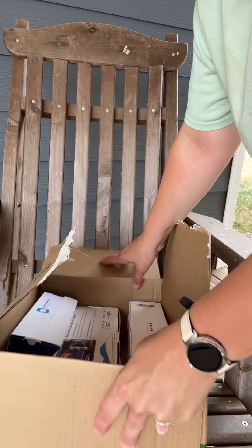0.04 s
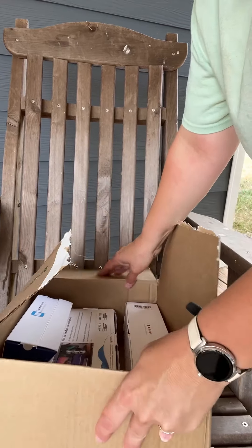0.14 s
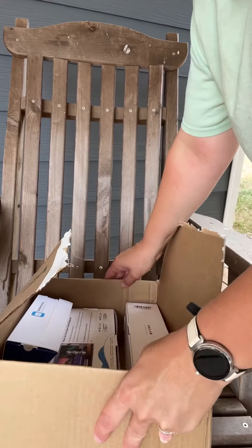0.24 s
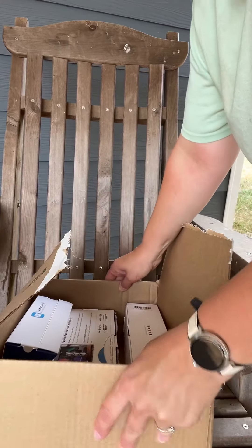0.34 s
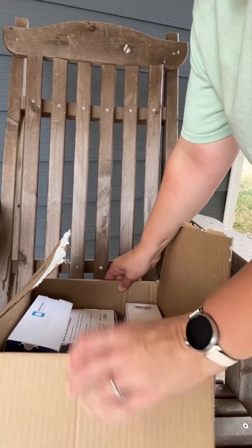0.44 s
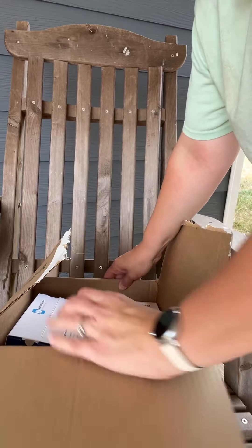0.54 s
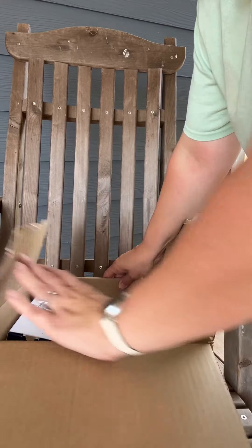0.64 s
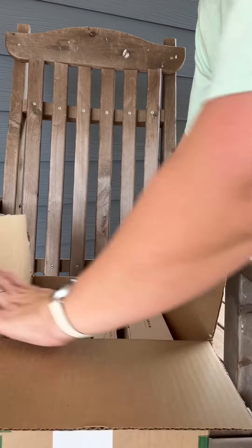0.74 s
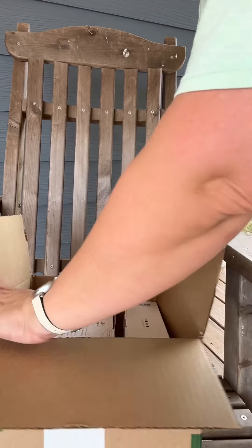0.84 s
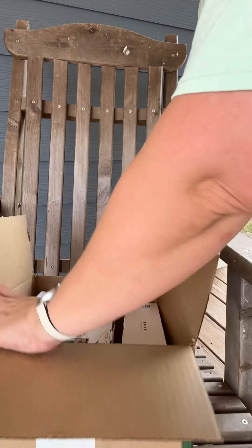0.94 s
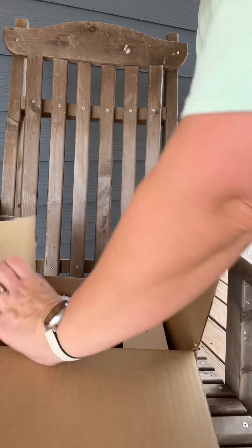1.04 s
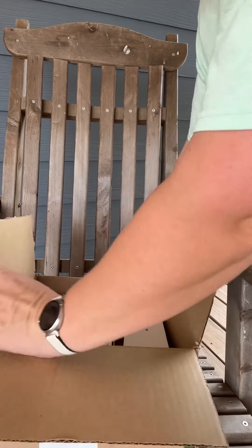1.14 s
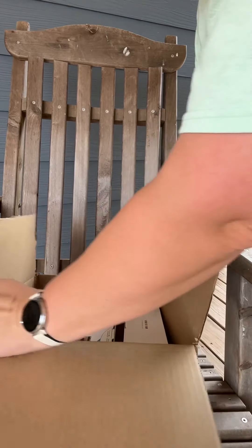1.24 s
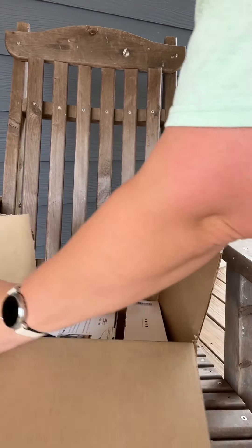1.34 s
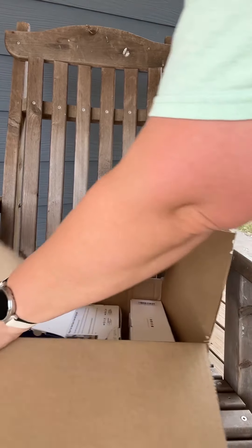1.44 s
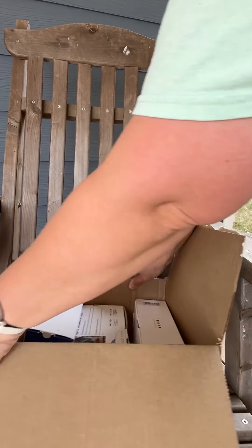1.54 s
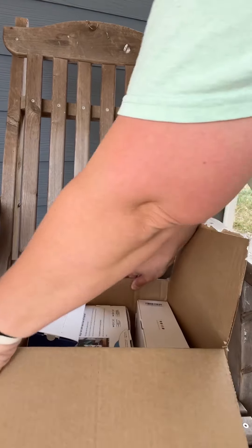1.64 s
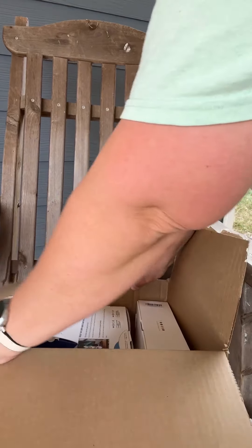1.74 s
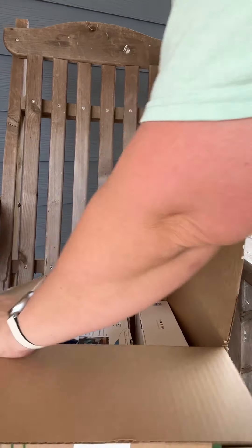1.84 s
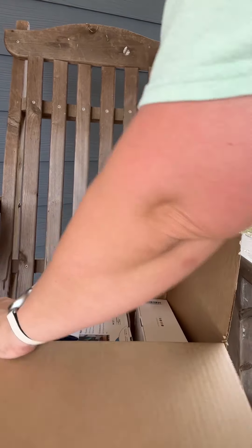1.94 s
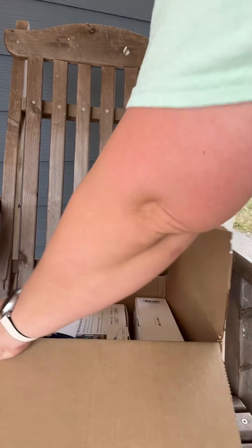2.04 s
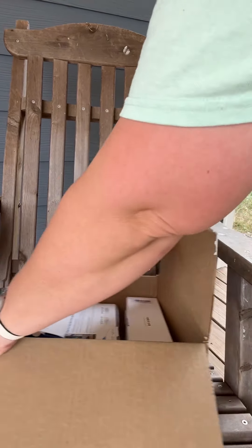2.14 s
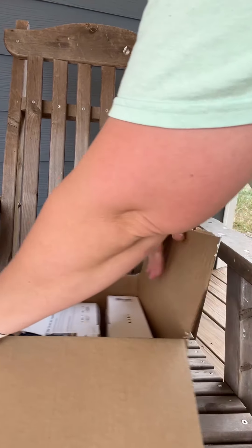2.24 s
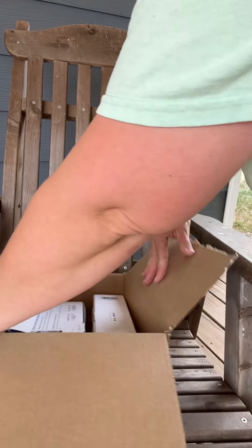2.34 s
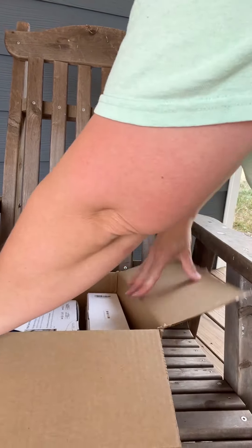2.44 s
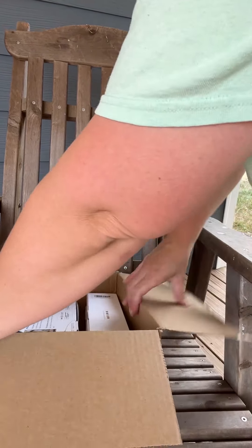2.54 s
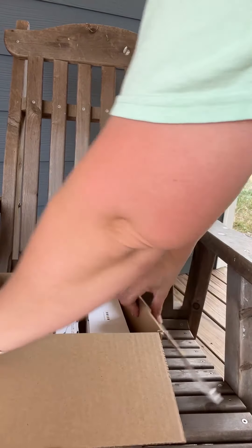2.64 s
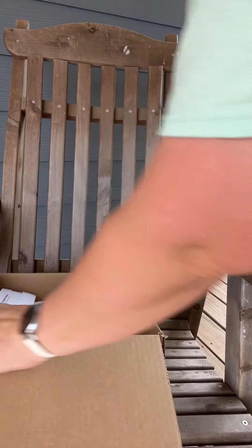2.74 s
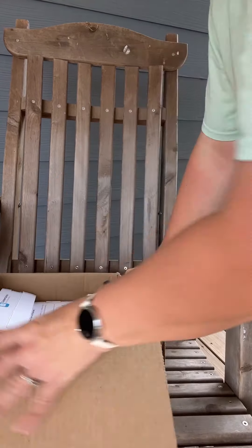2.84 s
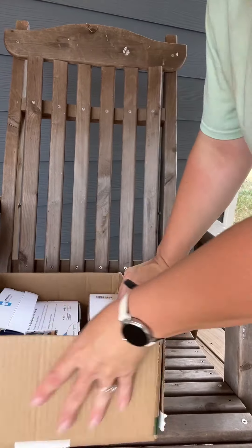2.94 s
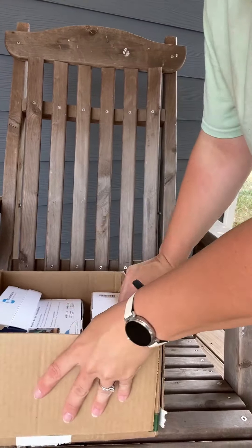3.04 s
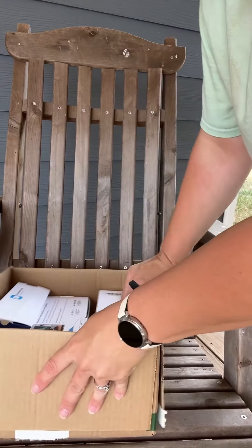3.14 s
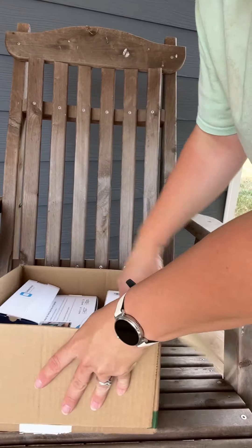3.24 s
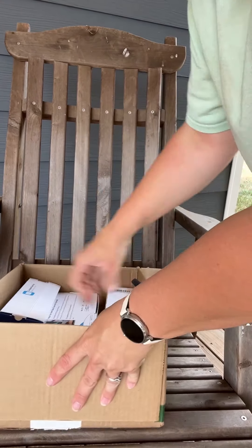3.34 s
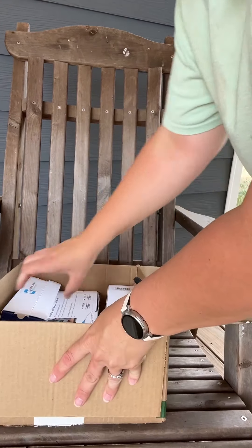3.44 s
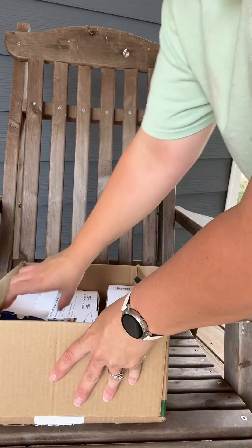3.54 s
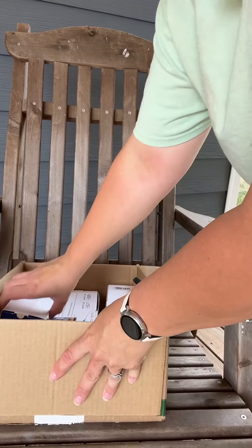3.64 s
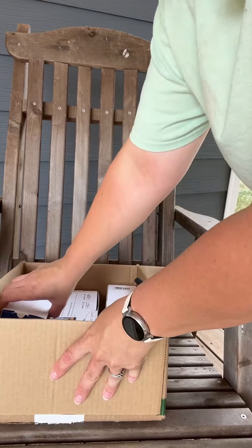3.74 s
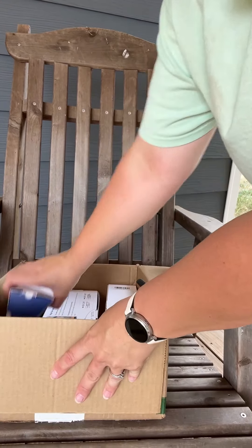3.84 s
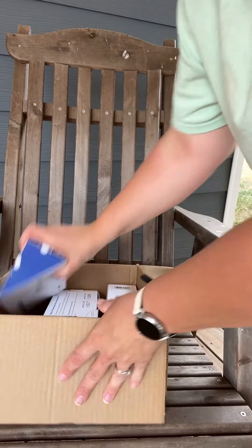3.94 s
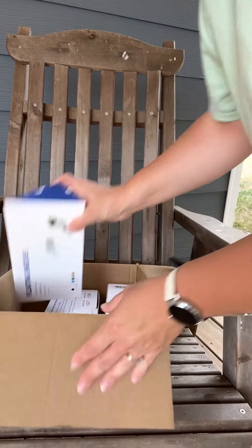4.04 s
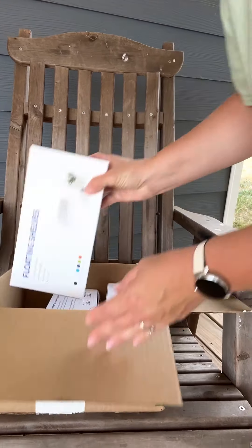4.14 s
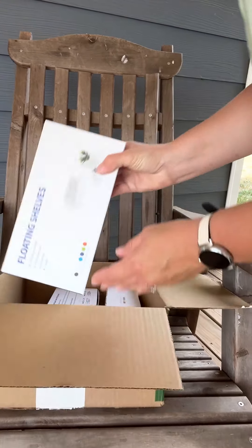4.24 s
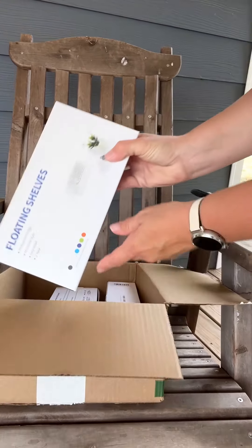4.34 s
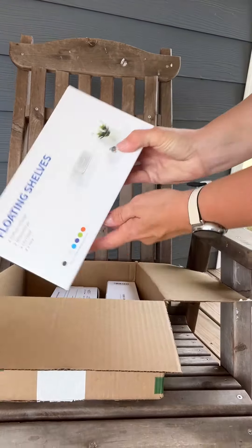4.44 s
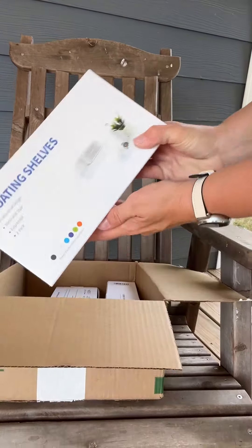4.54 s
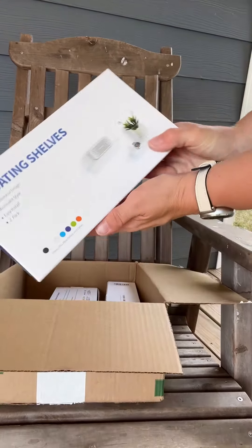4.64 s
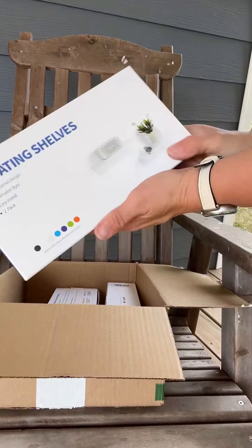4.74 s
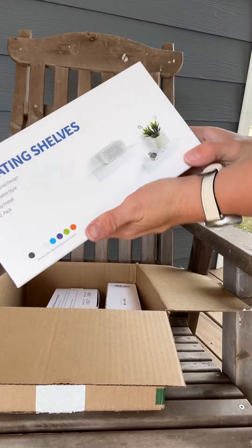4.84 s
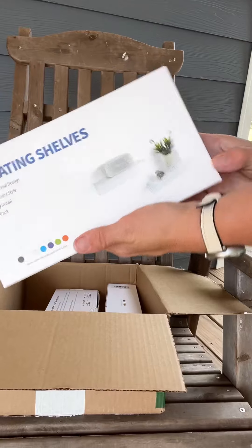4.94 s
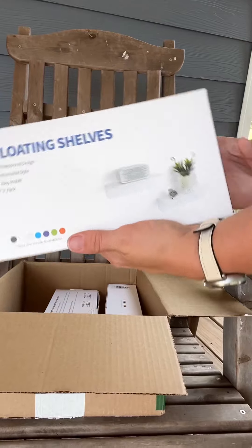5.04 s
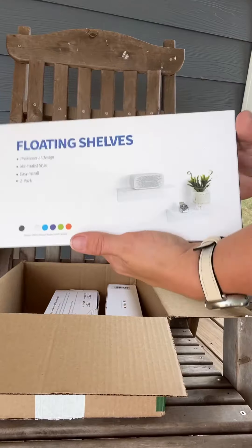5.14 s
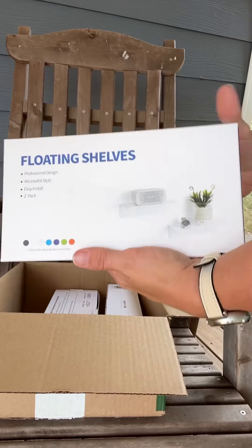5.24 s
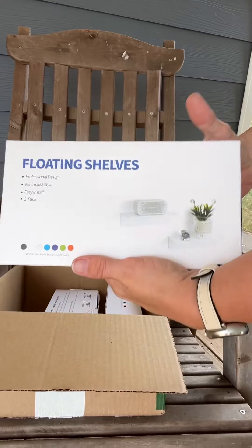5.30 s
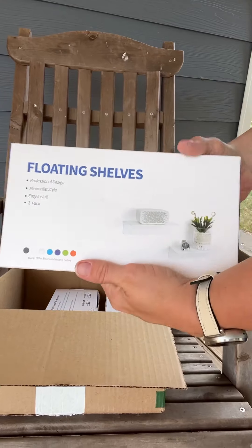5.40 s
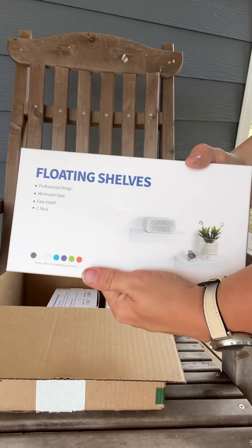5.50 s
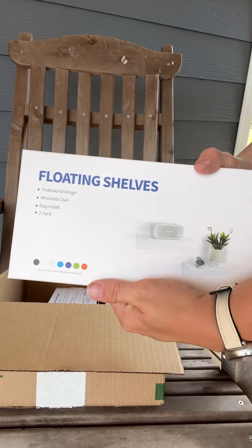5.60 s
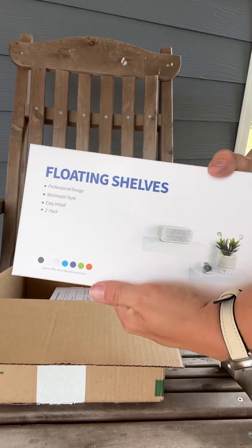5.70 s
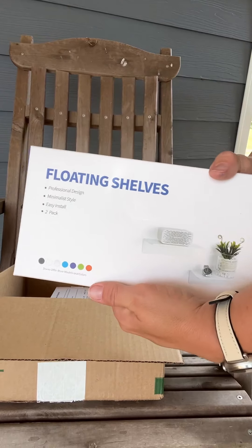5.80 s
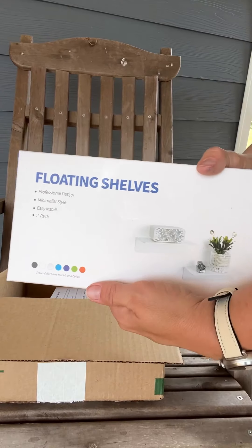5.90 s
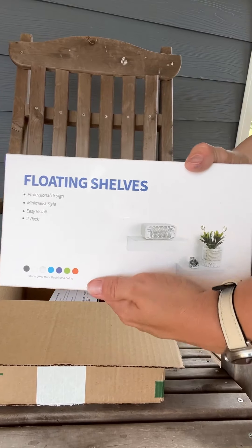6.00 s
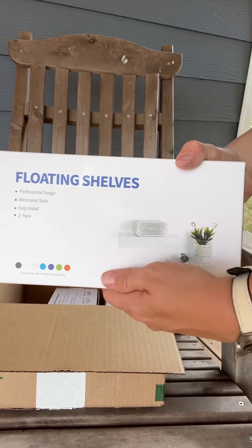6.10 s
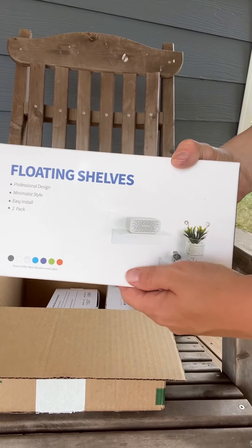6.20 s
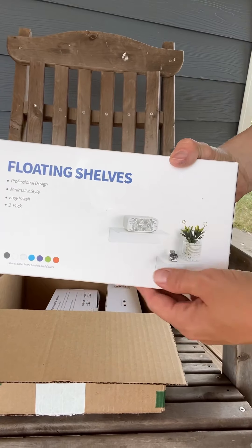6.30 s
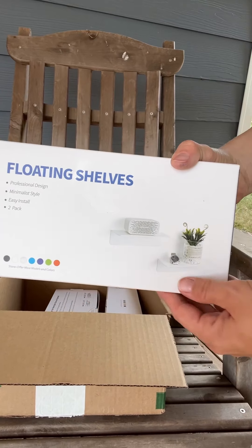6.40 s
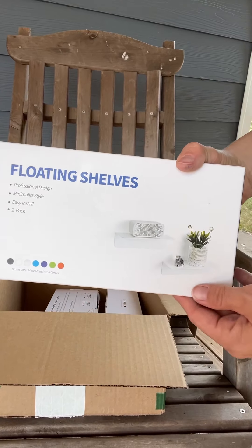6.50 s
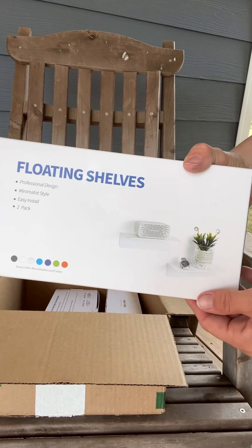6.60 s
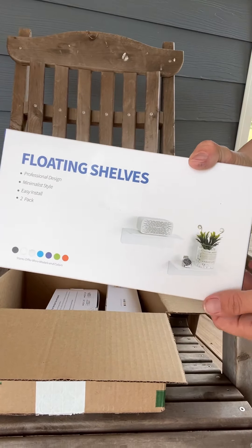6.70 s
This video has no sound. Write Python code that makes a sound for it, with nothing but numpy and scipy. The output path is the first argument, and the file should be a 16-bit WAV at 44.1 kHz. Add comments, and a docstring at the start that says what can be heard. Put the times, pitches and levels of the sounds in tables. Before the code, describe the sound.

A busy cardboard carton close up: stuttering flap, one loud knock, dry hissing scrapes with crackling fibres, boxy thumps with slight rattle, a few scratchy scuffs and sharp snaps. After about four seconds the activity thins to small muted taps and fine, bright finger rubbing on smooth card. Short diffuse porch reflections surround it, with faint low rumble outdoors beneath.

```python
"""Unpacking a carton, close up

A cardboard carton is unpacked on a wooden porch chair, close to a two-port microphone.
Slides are flickering noise; a tight flap judders free as stick-slip pulses ring its resonances.
Flaps thump as sagging panel tones with a ringing carton, and hard edges click as short noise snaps.
A small box is drawn out, caught with damped notes and stroked with bright noise.
The porch adds a short diffuse tail, and a faint outdoor rumble lies underneath."""
import sys
import numpy as np
from scipy import signal
from scipy.fft import rfft, irfft, next_fast_len
from scipy.io import wavfile
from scipy.ndimage import uniform_filter1d, map_coordinates

SR = 44100
rng = np.random.default_rng(int(sys.argv[2]) if len(sys.argv) > 2 else 0)


def generate_wav(signal):
    """Clip the signal to [-1, 1] and save it as 16-bit WAV at the path in sys.argv[1]."""
    frames = np.transpose(np.atleast_2d(signal))
    scaled = np.clip(frames, -1, 1) * 32767
    pcm = np.round(scaled).astype(np.int16)
    wavfile.write(sys.argv[1], SR, pcm)


N = 298116
TIME = np.arange(N) / SR
AGE = TIME[:SR // 2]  # time since a contact [s]

# distant outdoor rumble, spectrum: (frequency [Hz], relative level [dB per Hz])
OUTDOORS_SPECTRUM = [(20, -28), (35, -1.5), (52, 12.5), (75, -2.5), (115, 5.5), (190, -7.5), (600, -20),
                     (1500, -30), (14000, -46)]
# slides of card and skin over the carton, levels at full speed:
# (start [s], speeding up [s], slowing down [s], hiss level [dB], panel rasp level [dB])
SLIDES = [(-.06, 0.16, 0.064, -40, -47), (.09, 0.11, 0.048, -36, -34.5), (.2, 0.14, .05, -49, -45.5),
          (.33, 0.14, 0.057, -33.5, -43), (.565, 0.0033, 0.14, -41, -43), (.52, 0.042, 1, -52, -56),
          (.77, 0.12, 0.074, -43.5, -47.5), (.9, 0.09, 0.11, -47, -44.5), (1.06, 0.068, 0.45, -46.5, -55.5),
          (1.27, 0.18, 0.12, -44.5, -49.5), (1.47, 0.11, 0.18, -43, -46), (1.742, 0.0093, 0.26, -40, -47),
          (1.9, 0.15, 0.22, -49, -47), (2.1, 0.13, 0.27, -40, -44), (2.33, 0.36, 0.076, -42, -51.5),
          (2.59, 0.19, 0.2, -36.5, -46.5), (2.855, 0.045, 0.093, -29.5, -41.5),
          (2.96, 0.3, 0.052, -41, -43), (3.25, 0.11, 0.13, -44, -43), (3.36, 0.26, 0.2, -67, -56),
          (3.65, 0.01, 0.11, -53, -53.5), (3.75, 0.17, 0.17, -51, -51.5), (4.03, 0.075, 0.048, -49, -56),
          (4.12, 0.16, 0.25, -64.5, -58)]
# surface hiss of rubbed card: (frequency [Hz], relative level [dB per Hz])
CARD_HISS_SPECTRUM = [(300, -29), (1200, -3.5), (3000, -3.5), (6200, -1), (7800, -9.5), (10500, 1.5),
                      (13500, -1.5), (15000, -22.5)]
# rasp of the pressed panel: (frequency [Hz], relative level [dB per Hz])
PANEL_RASP_SPECTRUM = [(60, 2.5), (150, 4), (350, 2), (520, -5), (850, -0.5), (1500, -8), (2600, -20),
                       (9000, -32.5)]
# snapping fibres: (frequency [Hz], relative level [dB per Hz])
CRACKLE_SPECTRUM = [(400, -13), (1100, 1.5), (3000, -2.5), (6000, -8), (12000, -23)]
# likeness of rubbing at the two ports: (frequency [Hz], shared power [0 to 1])
PORT_LIKENESS = [(500, 0.54), (5000, .3), (9500, 0.65)]
# knocks on cardboard: (time [s], level [dB], settled panel pitch [Hz], panel t60 [s],
# contact brightness [Hz], carton ring and rattle against the panel [dB], pressing time [s])
KNOCKS = [(0.089, -34.5, 83.4, .15, 398.5, -13, 0.0078), (0.3363, -12.5, 346, 0.019, 3200, -4.5, 0.0013),
          (0.347, -27.5, 115, 0.044, 391, -2.5, 0.0024), (0.472, -36.5, 326, 0.14, 900, 4, .006),
          (0.6157, -27.5, 302.4, 0.11, 1680, 1.5, 0.00032), (1.172, -30, 690, 0.044, 1250, -4, 0.0048),
          (1.179, -20.5, 180, 0.17, 630, -0.5, 0.0035), (1.232, -27.5, 341, 0.044, 897, -3.5, 0.0039),
          (1.314, -34.5, 332, 0.043, 1730, 4.5, 0.0042), (1.326, -26.5, 67.6, 0.097, 303, -6, 0.011),
          (1.919, -32, 85, 0.14, 2200, -4.5, 0.0034), (1.968, -36, 322, 0.087, 1380, 10, 0.00054),
          (1.985, -32, 113, 0.17, 627, 3, 0.0043), (2.219, -25.5, 324, 0.13, 1250, -1.5, 0.0038),
          (2.234, -26.5, 244.5, 0.075, 1000, 0, 0.0068), (2.238, -29, 92.9, 0.21, 498, -3.5, 0.012),
          (2.513, -33, 183, 0.1, 586, 2, 0.0092), (2.745, -35, 272, 0.12, 1300, 5, 0.0065),
          (2.9704, -25.5, 460, 0.017, 2190, 6, 0.00098), (2.976, -28.5, 127, 0.028, 500, -7, 0.0038),
          (3.649, -42, 840, 0.048, 2440, 6, 0.00085), (3.666, -26, 268, 0.023, 430, -1, 0.0038),
          (3.927, -33, 263, 0.086, 1200, 0.5, 0.0008), (4.3518, -25, 387, 0.03, 1520, 5, 0.00075)]
# modes of the carton: (nominal pitch [Hz], nominal level [dB], t60 at damping 1 [s])
CARTON_MODES = [(103.5, -10.5, 0.28), (176.7, -8.5, 0.31), (255, -9, 0.31), (405, -2, 0.089),
                (554, -10.5, 0.085), (731, -4, 0.04), (995.5, -5.5, 0.11), (1262, -3.5, 0.044),
                (1610, -3, 0.043)]
# rattle of the contents: (frequency [Hz], relative level [dB per Hz])
RATTLE_SPECTRUM = [(40, 21.5), (110, 29.5), (350, 9.5), (520, -7.5), (1500, -3.5), (4000, 15.5),
                   (12000, -100)]
# tugs that drag the tight flap past its neighbour:
# (start of full pressure [s], time at full pressure [s], level [dB], brightness [Hz])
TUGS = [(0.125, .005, -19.5, 1393), (0.183, 0.015, -17, 5080)]
# resonances of that flap: (centre [Hz], width [Hz], level [dB])
FLAP_RESONANCES = [(100, 60, -10), (237, 40, -6), (398, 40, -6), (622, 40, -7), (732, 42, 3.5),
                   (974, 60, -6), (1290, 45, -7), (1500, 60, -11), (2050, 120, -11), (2350, 120, -12),
                   (2850, 300, -21)]
# sharp clicks of nails and card edges: (time [s], approximate peak level [dB], tilt [dB per octave])
TICKS = [(0.3364, -13, -3.5), (0.9843, -21.5, 5), (1.1709, -12, 4), (1.2025, -6.5, 1.2), (3.545, -31, -3.5),
         (3.769, -33, -2.5), (3.926, -27.5, -1), (4.272, -41.5, .5), (4.334, -22.5, -0.3)]
# click before its tilt: (frequency [Hz], relative level [dB per Hz])
CLICK_SPECTRUM = [(300, -14.5), (2700, -3), (5500, -5), (8000, -7), (11000, -4.5), (14000, -10.5),
                  (16000, -22.5)]
# scuffs that sing in one resonance of the card:
# (middle [s], half length [s], level [dB], start pitch [Hz], end pitch [Hz])
SCUFFS = [(0.444, 0.077, -45.5, 2460, 1290), (0.48, 0.022, -33.5, 1370, 1210),
          (0.961, 0.045, -43, 2500, 1990), (0.997, 0.0076, -37, 2800, 2970),
          (2.267, 0.059, -41, 1950, 1870), (2.757, .13, -42, 3400, 2210), (3.219, .035, -42.5, 2440, 2160),
          (3.308, .1, -46.5, 1000, 1200), (4.092, 0.062, -53.5, 940, 1060)]
# fingertips tapping the small box: (time [s], level [dB], pitch [Hz])
TAPS = [(4.206, -45, 336), (4.405, -44, 453), (5.259, -62, 646), (5.748, -61, 780)]
# finger strokes on the small glossy box, levels at full speed:
# (start [s], speeding up [s], slowing down [s], hiss level [dB], panel rasp level [dB])
STROKES = [(4.38, 0.039, 0.44, -60, -61.5), (4.65, 0.064, 0.42, -61.5, -62.5),
           (4.85, 0.072, 0.22, -58.5, -80), (5.124, 0.012, 0.14, -57, -66),
           (5.26, 0.19, 0.14, -64.5, -61.5), (5.67, 0.08, 0.14, -87, -67.5), (5.87, 0.39, 0.33, -49, -66.5)]
# hiss of fingers on glossy card: (frequency [Hz], relative level [dB per Hz])
SKIN_HISS_SPECTRUM = [(2000, -14.5), (5300, -3), (7600, -12), (10300, 4.5), (13200, -4), (15000, -5.5)]
# rasp of the glossy box: (frequency [Hz], relative level [dB per Hz])
GLOSS_RASP_SPECTRUM = [(80, -3), (350, -1.5), (1500, -8), (9000, -17)]
# handling sounds at the two ports: (frequency [Hz], left minus right [dB])
LEFT_SHADE = [(100, -3.5), (400, -2.5), (1200, -1), (5000, -4.5), (10000, -0.5)]
# decay of the porch: (frequency [Hz], t60 [s])
PORCH_DECAY = [(150, 0.32), (1000, 0.11), (10000, 0.069)]

SLIDE_POWER, STROKE_POWER = 0.96, 2.1  # amplitude grows as this power of the sliding speed
LAG_MS = 0.079  # the left port hears the hands first
PANEL_OVERTONE, OVERTONE_DB = 2.2, -11  # second mode of a struck panel: pitch ratio, level
BEND, BEND_S = 0.16, 0.0066  # a dented panel starts sharp by this share; time constant of its relaxing
REBOUND_SHARE, REBOUND_DB = 0.22, -8.5  # mean gap between rebounds over panel t60; change at each
LOAD_DB_PER_S, RELEASE_DB_PER_S = 720, 1703  # the judder grows under load, dies once the flap is free
TOP_HZ, SOFT_TOP_HZ = 15800, 14800  # microphone band limit, and where the treble starts to drop off


def amp(db):
    """Amplitude of a level in dB."""
    return 10 ** (np.asarray(db) / 20)


def unit(x):
    """x scaled to rms 1."""
    return x / np.sqrt(np.mean(x ** 2) + 1e-20)


def along(points, hz):
    """Value at hz between (frequency [Hz], value) points on a log axis."""
    f, value = np.transpose(points)
    return np.interp(np.log(hz + 1), np.log(f + 1), value)


def wobble(rate):
    """A smooth random curve, rate knots a second."""
    knots = rng.standard_normal(int(N * rate / SR) + 4)
    return map_coordinates(knots, [TIME * rate])


def filtered(x, response):
    """x times a complex response of frequency."""
    n = x.shape[-1]
    padded = next_fast_len(n + SR // 4)
    hz = np.fft.rfftfreq(padded, 1 / SR)
    return irfft(rfft(x, padded) * response(hz), padded)[..., :n]


def coloured(x, spectrum):
    """x with a spectrum, at rms 1."""
    return unit(filtered(x, lambda hz: amp(along(spectrum, hz))))


def pair(alike, size=N):
    """White noise in two channels that share a part of their power."""
    noise = rng.standard_normal((3, size))
    return np.sqrt(alike) * noise[0] + np.sqrt(1 - alike) * noise[1:]


def fade(t60, hold=0):
    """Free decay after a contact that lasts hold seconds."""
    return np.exp(-np.log(1000) * np.maximum(AGE - hold, 0) / t60)


def add(track, s, sound):
    """Mix a sound into the track from time s."""
    part = track[:, round(s * SR):][:, :sound.shape[-1]]
    part += sound[..., :part.shape[1]]


def ports(x, lag_ms):
    """Sound reaches the right microphone port lag_ms after the left."""
    side = np.array([[1], [-1]])
    return filtered(x, lambda hz: np.exp(1j * np.pi * hz * lag_ms / 1000 * side))


def resonance(hz, centre, width):
    """Complex response of one damped mode."""
    return 1j * hz * width / (centre ** 2 - hz ** 2 + 1j * hz * width)


def outdoors(left_db=-4.5, right_db=1.5):
    """A distant rumble that wavers."""
    level = amp(-57.5 + wobble(40))
    return level * coloured(pair(0.9), OUTDOORS_SPECTRUM) * amp([[left_db], [right_db]])


def patchy(x, depth_db):
    """The moving contact keeps changing which bands of the card respond."""
    bands = signal.stft(x, nperseg=512)[2]
    field = rng.standard_normal(bands.shape[1:])
    field = uniform_filter1d(field, size=6, axis=0)  # across frequency
    field = uniform_filter1d(field, size=12, axis=1)  # across time
    return signal.istft(bands * amp(depth_db * unit(field)), nperseg=512)[1][:, :N]


def friction(spectrum, lag_ms, grain_db, grain_rate, flutter_db=1.4, patchy_db=2.4):
    """Fibres catch and let go in tiny bursts, under an unsteady pressure."""
    bursts = amp(grain_db * wobble(grain_rate) + flutter_db * wobble(25.03))
    shared = filtered(pair(1), lambda hz: np.sqrt(along(PORT_LIKENESS, hz)))
    separate = filtered(pair(0), lambda hz: np.sqrt(1 - along(PORT_LIKENESS, hz)))
    rubbing = ports((shared + separate) * bursts, lag_ms)
    return coloured(patchy(rubbing, patchy_db), spectrum)


def slide_levels(rows, power):
    """Hiss and rasp follow each slide up to speed and back to rest; overlapping slides add in power."""
    energy = np.zeros((2, N))
    for s, rise, fall, hiss_db, rasp_db in rows:
        progress = np.interp(TIME, [s, s + rise, s + rise + fall], [0, 1, 0])
        speed = np.sin(np.pi / 2 * progress)
        energy += (amp([[hiss_db], [rasp_db]]) * speed ** power) ** 2
    return np.sqrt(energy)


def speeding(x, level, brisk_db, tilt=0.2):
    """A faster stroke is louder, and its top octave gains on the rest, drawing even at brisk_db."""
    top = filtered(x, lambda hz: 1 - 1 / (1 + (hz / 8000) ** 8))
    top_gain = (level / amp(brisk_db)) ** tilt
    return level * (x + (top_gain - 1) * top)


def crackle(per_s=300, spread_db=2):
    """Coarse fibres snap free at random moments, all about equally strongly."""
    strength = amp(spread_db * np.minimum(rng.exponential(size=N), 2))
    snaps = (rng.random(N) < per_s / SR) * strength
    return coloured(ports(snaps * pair(0.14), LAG_MS), CRACKLE_SPECTRUM)


def sliding(crackle_db=-7.5):
    """Rubbed card hisses at the surface; when pressed, the panel rasps and crackles too."""
    hiss_level, rasp_level = slide_levels(SLIDES, SLIDE_POWER)
    hiss = friction(CARD_HISS_SPECTRUM, lag_ms=LAG_MS, grain_db=1.3, grain_rate=2200)
    rasp = friction(PANEL_RASP_SPECTRUM, lag_ms=LAG_MS, grain_db=1.7, grain_rate=500)
    pressed = rasp_level * (rasp + amp(crackle_db) * crackle())
    return speeding(hiss, hiss_level, brisk_db=-32.5) + pressed


def carton(damping, press):
    """One blow on the carton's modes; their balance and tuning vary at random from blow to blow."""
    ring = np.zeros((2, len(AGE)))
    for k, (hz, db, t60) in enumerate(CARTON_MODES):
        level = (-1) ** k * amp(db + rng.normal(0, 2.3, (2, 1)))
        tone = np.sin(2 * np.pi * hz * rng.normal(1, 0.051) * AGE)
        ring += level * tone * fade(t60 * damping, press)
    return ring


def knocks(free_t60=0.12, rattle_db=-6, settle_db=-21, settle_stretch=6.6, lowest_share=0.63):
    """The panel booms and sags in pitch; the carton rings at uneven rebounds; contents rattle, settle."""
    track = np.zeros((2, N))
    for s, db, panel_hz, t60, bright_hz, ring_db, press in KNOCKS:
        push = np.sin(np.pi / 2 * np.minimum(AGE / press, 1))
        phase = 2 * np.pi * panel_hz * np.cumsum(1 + BEND * np.exp(-AGE / BEND_S)) / SR
        overtone = amp(OVERTONE_DB) * np.sin(PANEL_OVERTONE * phase) / (1 + (panel_hz / bright_hz) ** 2)
        panel = (np.sin(phase) + overtone) * fade(t60, press)
        # a hand that damps the panel damps the other modes and the contents as well
        damping = np.sqrt(t60 / free_t60)
        ring = carton(damping, press)
        rebounds = np.cumsum(REBOUND_SHARE * t60 * (.5 + rng.random(size=3)))
        for k, delay in enumerate(rebounds):
            add(ring, delay, amp(REBOUND_DB * (k + 1)) * carton(damping / 2, 0))
        settling = amp(settle_db) * fade(settle_stretch * t60, press)
        shaking = amp(rattle_db) * fade(t60, press) + settling
        rattle = shaking * coloured(pair(0.82, size=len(AGE)), RATTLE_SPECTRUM)
        # a soft contact cannot excite the high modes, nor a small stiff panel the low ones
        soft = signal.butter(2, bright_hz, fs=SR)
        stiff = signal.butter(3, lowest_share * panel_hz, "high", fs=SR)
        body = signal.lfilter(*stiff, signal.lfilter(*soft, ring / 2 + rattle))
        add(track, s, amp(db) * push * (panel + amp(ring_db) * body))
    return ports(track, lag_ms=0.022)


def flap(hz):
    """The flap's resonances, summed with alternating sign."""
    return sum((-1) ** k * amp(db) * resonance(hz, centre, width)
               for k, (centre, width, db) in enumerate(FLAP_RESONANCES))


def judder(slip_hz=242, jitter=.12, scatter_db=4.0, flex_s=0.00033, crunch_db=-12, left_db=2):
    """The flap's edge sticks and slips; the slips ring the flap, which flexes out of tune and crunches."""
    turns = np.cumsum(slip_hz * (1 + jitter * wobble(160))) / SR
    slips = np.diff(np.floor(turns), prepend=0) * amp(scatter_db * wobble(200.4))
    drive = unit(slips) + pair(0.43)
    force = np.zeros((2, N))
    for s, hold, db, bright_hz in TUGS:
        load = LOAD_DB_PER_S * np.maximum(s - TIME, 0)
        release = RELEASE_DB_PER_S * np.maximum(TIME - s - hold, 0)
        pressure = amp(db - load - release)
        force += signal.lfilter(*signal.butter(1, bright_hz, fs=SR), drive * pressure)
    flexed = TIME + flex_s * wobble(70)  # a wavering time base bends the pitch
    ring = np.array([np.interp(flexed, TIME, port) for port in filtered(force, flap)])
    ring /= np.std(filtered(drive, flap))
    crunch = amp(crunch_db) * filtered(force, lambda hz: amp(along(CRACKLE_SPECTRUM, hz)))
    return ports(ring + crunch, lag_ms=0.25) * amp([[left_db / 2], [-left_db / 2]])


def ticks(snap_t60=0.019, tail_db=-23, tail_t60=0.12):
    """A hard edge snaps against the card, which answers briefly."""
    track = np.zeros((2, N))
    decay = fade(snap_t60) + amp(tail_db) * fade(tail_t60)
    for s, peak_db, tilt in TICKS:
        colour = [(hz, level + tilt * np.log2(hz)) for hz, level in CLICK_SPECTRUM]
        snap = coloured(pair(0.81, size=len(AGE)), colour) * decay
        add(track, s, amp(peak_db - 11.0) * snap)  # noise peaks stand about 11 dB above its rms
    return ports(track, lag_ms=LAG_MS)


def scuffs(q=2.5, grain_db=3.0, catch_db=2.5):
    """An edge drags in scratchy catches; the card answers in a band that glides as the contact moves."""
    track = np.zeros((2, N))
    for s, half_length, db, start_hz, end_hz in SCUFFS:
        size = int(2 * half_length * SR)
        glide = np.exp(2j * np.pi * np.cumsum(np.linspace(start_hz, end_hz, size)) / SR)
        catches = amp(grain_db * wobble(900)[:size] + catch_db * wobble(140)[:size])
        drag = pair(0.81, size=size) * catches
        # shift the gliding pitch to zero, keep a narrow band, shift back
        band = signal.lfilter(*signal.butter(2, start_hz / (2 * q), fs=SR), drag / glide)
        scratch = unit(np.real(band * glide))
        add(track, s - half_length, amp(db) * np.hanning(size) * scratch)
    return ports(track, lag_ms=LAG_MS)


def taps(t60=0.061, q=2.5):
    """A fingertip lands on the small full box, which answers with one dull, well damped note."""
    track = np.zeros((2, N))
    for s, db, pitch in TAPS:
        noise = pair(0.84, size=len(AGE))
        note = unit(filtered(noise, lambda hz: resonance(hz, pitch, pitch / q)))
        add(track, s, amp(db) * fade(t60) * note)
    return track


def stroking():
    """Fingers on glossy card give a finer, brighter hiss over a faint rasp."""
    hiss_level, rasp_level = slide_levels(STROKES, STROKE_POWER)
    # negative lags: the right port hears the strokes first
    hiss = friction(SKIN_HISS_SPECTRUM, lag_ms=-0.08, grain_db=0.0, grain_rate=2200, flutter_db=2.5)
    rasp = friction(GLOSS_RASP_SPECTRUM, lag_ms=-0.19, grain_db=3.0, grain_rate=220,
                    flutter_db=0.5, patchy_db=0.2)
    return speeding(hiss, hiss_level, brisk_db=-39.5) + rasp_level * rasp


def shaded(x):
    """The left port lies a little in shadow, most of all in the bass and upper mids."""
    side = np.array([[1], [-1]])
    return filtered(x, lambda hz: amp(along(LEFT_SHADE, hz) * side / 2))


def porch(x):
    """The wall and boards answer with a short diffuse tail."""
    hz, t, bands = signal.stft(rng.standard_normal((2, len(AGE))), SR, nperseg=256)
    decay = np.exp(-np.log(1000) * t / along(PORCH_DECAY, hz)[:, None])
    tail = signal.istft(bands * decay, SR, nperseg=256)[1]
    tail = tail[:, :len(AGE)] * (1 - fade(0.0065))  # the tail builds up over a few milliseconds
    return signal.fftconvolve(x, tail / np.linalg.norm(tail[0]), axes=1)[:, :N]


def scene():
    """The hands at work close by, their echo off the porch, and the outdoors beyond."""
    handling = shaded(sliding() + knocks() + judder() + ticks() + scuffs() + taps() + stroking())
    return outdoors() + handling + amp(-8.5) * porch(handling)


def record(dry):
    """The microphone sheds deep bass; the treble drops off steeply at the band limit."""
    thinned = signal.sosfilt(signal.butter(2, 38, "high", fs=SR, output="sos"), dry)
    return filtered(thinned, lambda hz: (hz < TOP_HZ) / np.sqrt(1 + (hz / SOFT_TOP_HZ) ** 100))


dry = scene()
out = record(dry)
generate_wav(out)
```